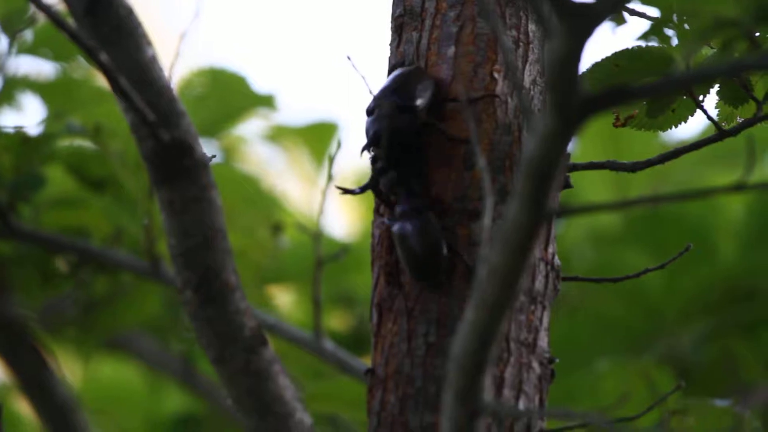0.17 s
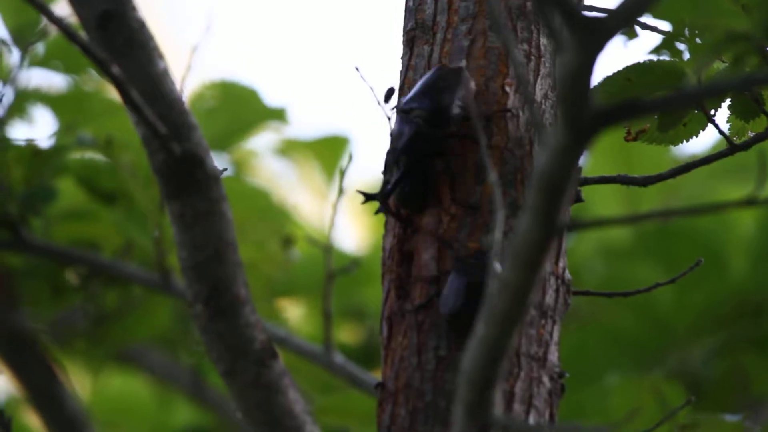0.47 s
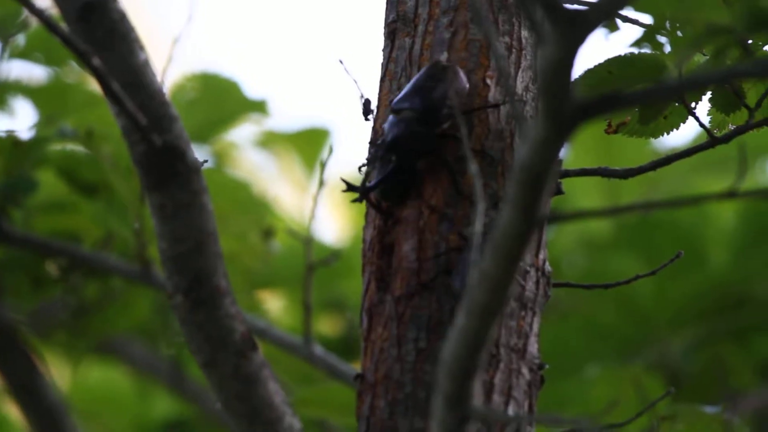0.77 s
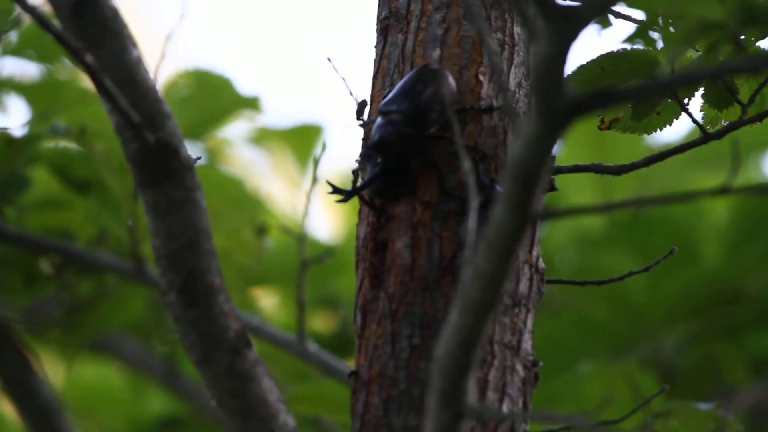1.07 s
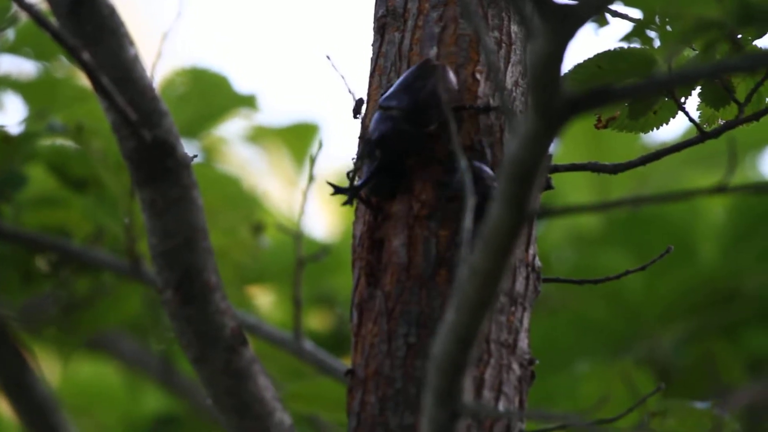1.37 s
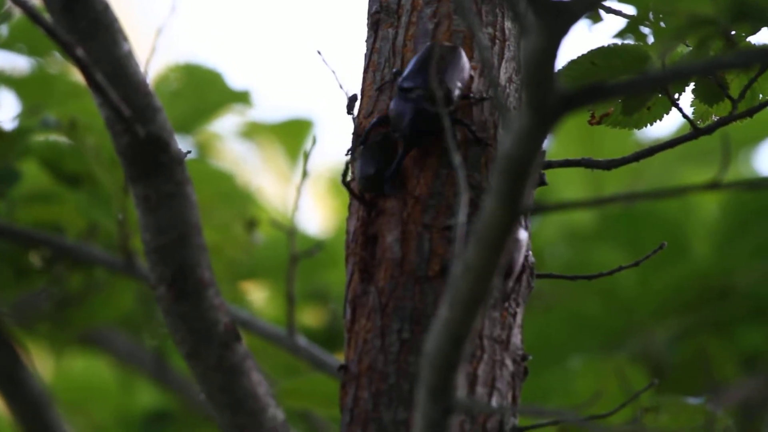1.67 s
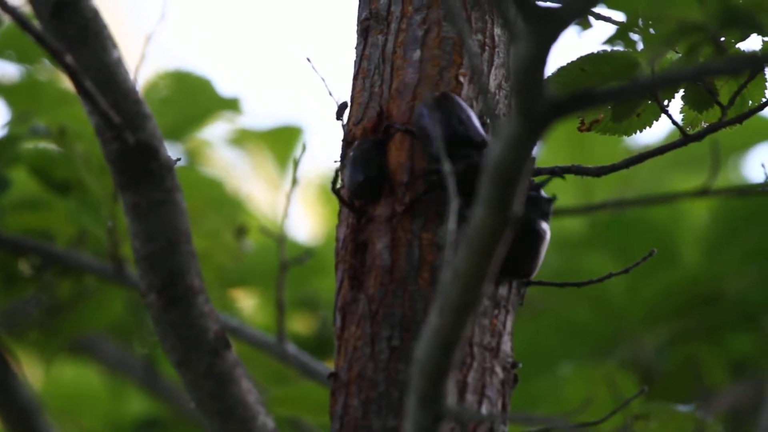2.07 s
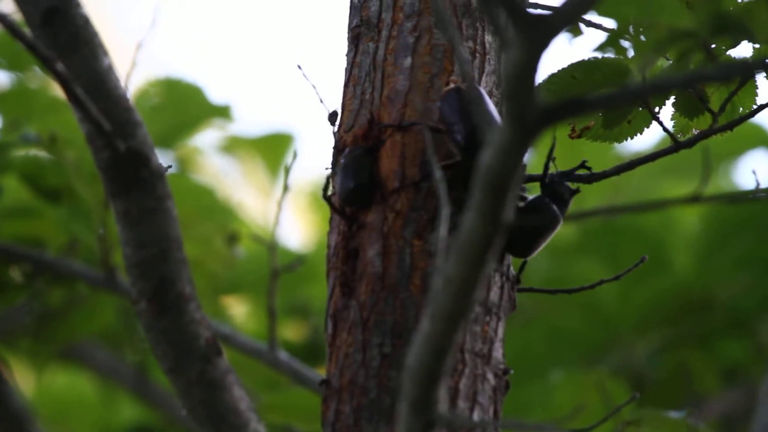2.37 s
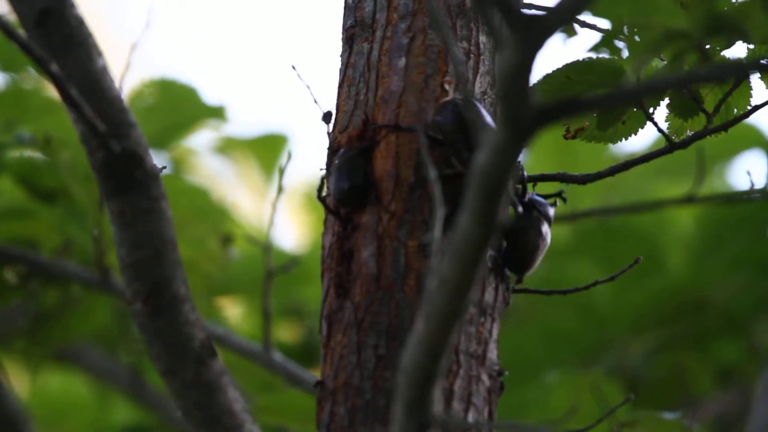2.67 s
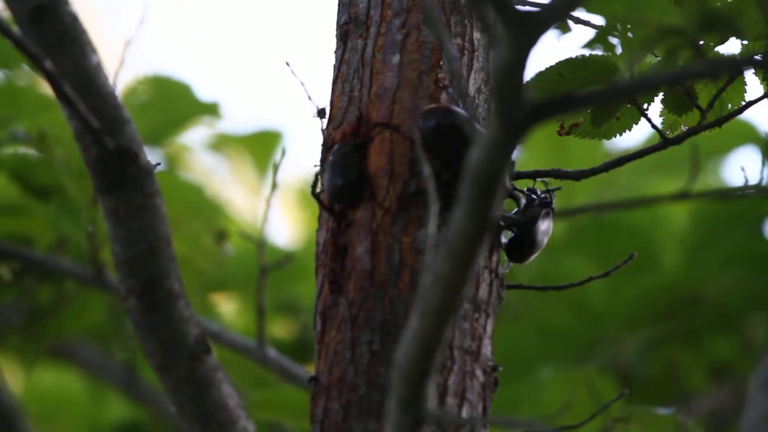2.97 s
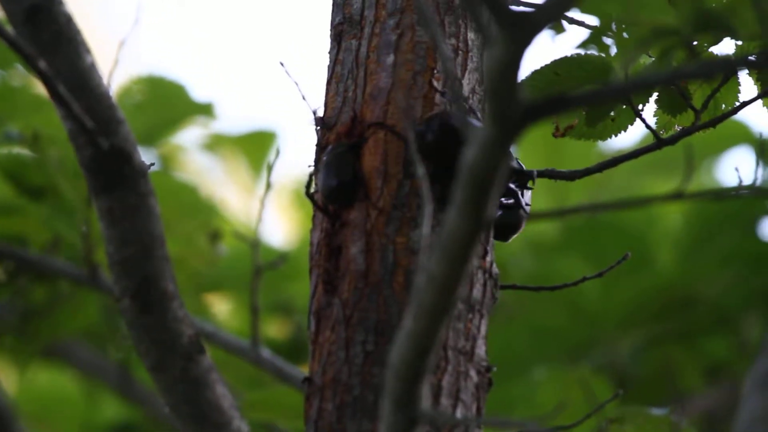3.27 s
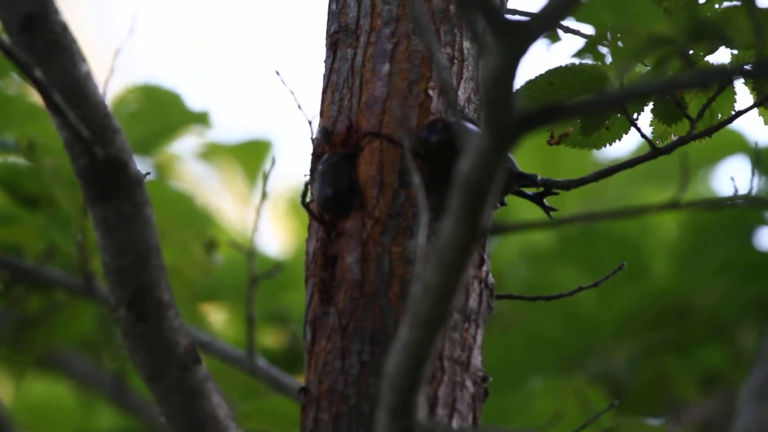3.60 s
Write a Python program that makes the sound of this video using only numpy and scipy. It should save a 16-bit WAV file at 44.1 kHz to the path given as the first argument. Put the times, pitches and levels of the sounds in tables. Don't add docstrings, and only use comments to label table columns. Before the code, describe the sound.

Continuous sizzling insect chorus over quiet air and a distant low drone. A small bump and rustle open it, then quick dry chirps and a fine trill build, with soft knocks near the end, centred outdoors.

```python
import sys
import numpy as np
from scipy import signal
from scipy.fft import rfft, irfft
from scipy.io import wavfile

SR = 44100
rng = np.random.default_rng(int(sys.argv[2]) if len(sys.argv) > 2 else 0)


def magnitude_from_level(level_db):
    exponent = np.asarray(level_db, float) / 20
    return 10 ** exponent


def transcribe(signal):
    frames = np.atleast_2d(signal).T
    limited = np.clip(frames, -1, 1)
    pcm = np.round(limited * 32767).astype(np.int16)
    wavfile.write(sys.argv[1], SR, pcm)


N = 164934
T = np.arange(N) / SR

# (time [s], level [dB])
CHORUS_LEVEL = [(.04, -42), (.3, -42), (.5, -41), (.8, -40), (1.1, -42), (1.7, -40.5), (2.3, -42),
                (2.68, -41.5), (2.8, -42), (3.3, -43), (3.74, -43.5)]
# (frequency [Hz], density [dB per Hz])
CHORUS_TONE = [(6500, -30), (8000, -22), (9900, -16), (11600, -8.5), (12650, -1.8), (13600, 0),
               (14500, -1.2), (15800, -3.5)]
CHORUS_CLICKS_PER_S, CHORUS_SPREAD_DB, CHORUS_FLICKER_DB = 9000, 2.5, 0.47

# (start [s], length [s], throb rate [1/s])
BOUTS = [
    (.753, .93, 14.7),
    (1.811, .55, 14.5),
    (2.44, .33, 15.2),
    (2.81, .9, 15.6),
]
BOUT_LEVELS = [-48.5, -50.5, -50, -50.5]
# (frequency [Hz], density [dB per Hz])
BOUT_TONE = [(9500, -16), (11200, -5), (12600, 0), (13600, 0), (15800, -5)]
BOUT_SHARP, BOUT_CLICKS_PER_S = 1.6, 7000

# (time [s], level [dB])
CHIRPS = [(.178, -64), (.294, -60), (.415, -59), (.526, -56), (.637, -60), (.75, -53), (.862, -52),
          (.978, -53), (1.092, -52), (1.203, -53), (1.314, -53), (1.423, -53), (1.536, -51.5), (1.648, -53),
          (1.762, -52), (1.87, -51), (1.978, -52), (2.092, -51.5), (2.198, -52), (2.312, -52.5),
          (2.423, -52.5), (2.528, -53.5), (2.64, -51.5), (2.746, -51.5), (2.859, -52.5), (2.962, -52.5),
          (3.08, -51.5), (3.188, -51.5), (3.417, -57.5)]
CHIRP_RISE_S, CHIRP_FALL_S = .019, .017
OPEN_LEAD_S, OPEN_S, OPEN_DB = .045, .005, -6
TEETH_PER_S, TEETH_SPREAD_DB = 4800, 3
WING_MODE_HZ = [7727, 7902, 8355, 8585, 9075, 9214, 9250, 9511, 10583, 10779]
# (width [Hz], level [dB])
WING_MODE_SHAPES = [(25, -2), (18, -3), (18, -3), (45, 0), (30, -1), (20, 1), (22, -1), (28, 1), (40, 2),
                    (24, 2)]
# (frequency [Hz], width [Hz], level [dB])
WING_HUMPS = [(7880, 690, -9.5), (8750, 460, -5), (9400, 780, 0.5), (10500, 3100, -4.5)]
WING_LAG_S_PER_KHZ = .005

# (time [s], level [dB])
TRILL_LEVEL = [(.1, -76.5), (.3, -71), (.55, -64), (1.5, -65), (2.72, -66), (2.82, -72), (3.2, -76),
               (3.5, -90)]
TRILL_PER_S, TRILL_SAG_PER_S2, TRILL_JITTER_S = 114.5, 1.1, .0008
TRILL_HZ, TRILL_WIDTH_HZ = 6720, 140

# (start [s], length [s], level [dB], centre [Hz], width [Hz])
TOUCHES = [
    (.0355, .015, -46, 810, 150),
    (.04, .056, -58.5, 3150, 900),
    (.042, .045, -62, 4450, 600),
    (.058, .012, -50, 670, 150),
    (.075, .023, -49, 760, 200),
    (.72, .17, -55, 790, 160),
    (2.676, .022, -49.5, 620, 260),
    (3.387, .010, -61, 3800, 2500),
    (3.389, .03, -55, 520, 300),
]

# (time [s], level [dB], tilt toward the upper pipes [dB])
DRONE_LEVEL = [(.04, -48.5, 0), (.33, -52.5, 0), (.6, -47, 0.5), (.72, -49, 0.5), (.88, -51, 2.5),
               (.95, -51.5, -1), (1.55, -50.5, -0.5), (1.7, -51, 0), (2.1, -52.5, -0.5), (2.5, -52, -2.5),
               (2.9, -52, 0.5), (3.1, -49.5, 0.5), (3.5, -53, -0.5), (3.74, -51, -3.5)]
# (frequency [Hz], width [Hz], level [dB])
DRONE_PIPES = [(307.3, 29.4, -6.5), (356.4, 42.4, -5.5), (459.6, 34, -3), (642, 85, 2), (773, 119, -8.5),
               (538, 337, -13)]
DRONE_WANDER_DB, TILT_PIVOT_HZ = 1.5, 580

# (frequency [Hz], width [Hz], level [dB], wander
# [dB])
FAR_BANDS = [(5650, 600, -64.5, 1.0), (7160, 470, -69, 0.5), (1362, 70, -69, 1.5)]
# (time [s], level [dB])
FAR_REST = [
    (.8, 2),
    (.95, -6),
    (2.9, -1),
    (3.3, -1),
]

# (frequency [Hz], density [dB per Hz])
AIR_TONE = [(25, -26.5), (150, -1.5), (330, 1.5), (900, -1.5), (1600, -3.5), (3000, -6), (5000, -9),
            (9000, -6)]
AIR_DB = -53.5

START_S, CUTOFF_HZ = .0352, 15765


def rms_one(x):
    return x / np.sqrt(np.mean(x ** 2) + 1e-20)


def curve_gain(rows):
    return magnitude_from_level(np.interp(T, *np.transpose(rows)))


def drift(rate):
    r = np.exp(-80 * np.pi * rate / SR)
    noise = rng.standard_normal(N // 40 + 2002)
    slow = signal.lfilter([1], [1, -2 * r, r * r], noise)[2000:]
    return np.interp(np.arange(N) / 40, np.arange(len(slow)), rms_one(slow))


def colour(x, tone):
    hz, db = np.transpose(tone)
    f = np.fft.rfftfreq(N, 1 / SR) + 1
    edge_db = -40 * np.maximum(np.log2(hz[0] / f), 0)
    gain = magnitude_from_level(np.interp(np.log(f), np.log(hz), db) + edge_db)
    return rms_one(irfft(rfft(x) * gain, N))


def resonate(x, hz, width_hz):
    r = np.exp(-np.pi * width_hz / SR)
    top = np.array([1, 0, -1]) * (1 - r * r) / 2
    return signal.lfilter(top, [1, -2 * r * np.cos(2 * np.pi * hz / SR), r * r], x)


def resonate_twice(x, hz, width_hz):
    return resonate(resonate(x, hz, width_hz), hz, width_hz)


def clicks(per_s, spread_db):
    size = magnitude_from_level(spread_db * np.minimum(rng.exponential(1, N), 5)) * rng.choice([-1, 1], N)
    return size * (rng.random(N) < per_s / SR)


def chorus():
    flicker = magnitude_from_level(CHORUS_FLICKER_DB * (drift(20) + .6 * drift(5) + .7 * drift(90)))
    strokes = clicks(CHORUS_CLICKS_PER_S, CHORUS_SPREAD_DB) * flicker
    return curve_gain(CHORUS_LEVEL) * colour(strokes, CHORUS_TONE)


def near_singer():
    shape = 0
    for (s, length, rate), db in zip(BOUTS, BOUT_LEVELS):
        swell = np.sqrt(np.sin(np.pi * np.clip((T - s) / length, 0, 1)).clip(0))
        throb = 2 * np.abs(np.sin(np.pi * rate * (T - s))) ** (2 * BOUT_SHARP)
        shape = shape + magnitude_from_level(db) * swell * throb
    return shape * magnitude_from_level(1.2 * drift(6)) * colour(clicks(BOUT_CLICKS_PER_S, 2.5), BOUT_TONE)


def bush_cricket():
    shape = 0
    for s, db in CHIRPS:
        closing_s = np.where(T < s, CHIRP_RISE_S, CHIRP_FALL_S)
        closing = np.exp(-.5 * ((T - s) / closing_s) ** 2)
        opening = magnitude_from_level(OPEN_DB) * np.exp(-.5 * ((T - s + OPEN_LEAD_S) / OPEN_S) ** 2)
        shape = shape + magnitude_from_level(db) * (closing + opening)

    teeth = clicks(TEETH_PER_S, TEETH_SPREAD_DB)
    modes = [(hz, w, db) for hz, (w, db) in zip(WING_MODE_HZ, WING_MODE_SHAPES)]
    song, plain = 0, 0
    for k, (hz, w, db) in enumerate(modes + WING_HUMPS):
        ring = (-1) ** k * magnitude_from_level(db) * resonate(teeth, hz, w)
        lag = WING_LAG_S_PER_KHZ * (min(hz, 9800) - 8700) / 1000
        song = song + np.interp(T - lag, T, shape) * ring
        plain = plain + ring
    return song / np.std(plain)


def trill():
    late = T + TRILL_JITTER_S * drift(8.8)
    turns = np.maximum.accumulate(TRILL_PER_S * late - .5 * TRILL_SAG_PER_S2 * late ** 2)
    struck = np.diff(np.floor(turns), prepend=0) > 0
    strokes = struck * magnitude_from_level(1.2 * rng.standard_normal(N)) + 1e-18
    ring = rms_one(resonate_twice(strokes, TRILL_HZ, TRILL_WIDTH_HZ))
    return curve_gain(TRILL_LEVEL) * magnitude_from_level(1.1 * drift(13)) * ring


def touches():
    out = 0
    for s, length, db, hz, w in TOUCHES:
        edge = np.clip(np.minimum(T - s, s + length - T) / .004, 0, 1)
        burst = edge * resonate_twice(rng.standard_normal(N), hz, w)
        out = out + magnitude_from_level(db) * burst * np.sqrt(np.sum(edge ** 2) / np.sum(burst ** 2))
    return out


def drone():
    s, level_db, tilt_db = np.transpose(DRONE_LEVEL)
    tilt_db = np.interp(T, s, tilt_db)
    out = 0
    for hz, w, db in DRONE_PIPES:
        pipe_tilt_db = tilt_db * 2 * np.log2(hz / TILT_PIVOT_HZ)
        gain = magnitude_from_level(db + DRONE_WANDER_DB * drift(2.5) + pipe_tilt_db)
        out = out + gain * resonate_twice(rng.standard_normal(N), hz, 1.25 * w)
    return rms_one(out) * magnitude_from_level(np.interp(T, s, level_db))


def far_bands():
    out = 0
    for (hz, w, db, wander_db), rest in zip(FAR_BANDS, [1, curve_gain(FAR_REST), 1]):
        sos = signal.butter(2, [hz - w / 2, hz + w / 2], "band", fs=SR, output="sos")
        band = rms_one(signal.sosfilt(sos, rng.standard_normal(N)))
        wander = wander_db * (drift(3.4) + 0.39 * drift(15))
        out = out + rest * magnitude_from_level(db + wander) * band
    return out


def air():
    return magnitude_from_level(AIR_DB + .5 * drift(12)) * colour(rng.standard_normal(N), AIR_TONE)


def scene():
    insects = chorus() + near_singer() + bush_cricket() + trill()
    mono = insects + touches() + drone() + far_bands() + air()
    return np.array([mono, mono])


def band_limit(x):
    return signal.sosfilt(signal.butter(12, 16710, fs=SR, output="sos"), x)


def record(dry):
    opening = np.clip((T - START_S) / .0012, 0, 1)
    top_cut = np.clip((CUTOFF_HZ - np.fft.rfftfreq(N, 1 / SR)) / 30, 0, 1)
    mix = irfft(rfft(dry * opening) * top_cut, N)
    return band_limit(mix)


dry = scene()
out = record(dry)
transcribe(out)
```